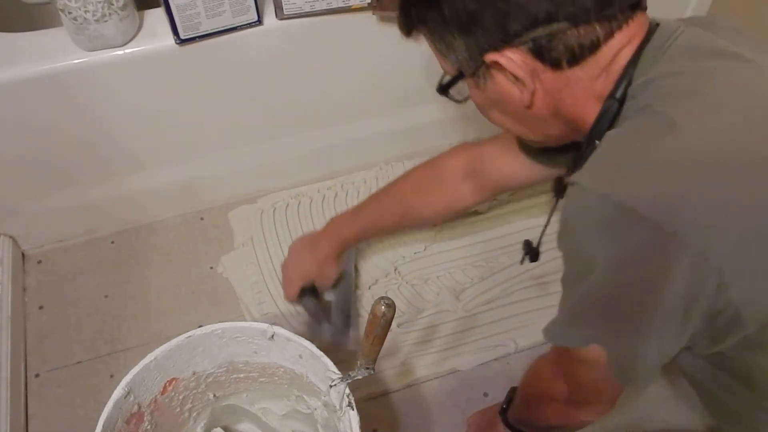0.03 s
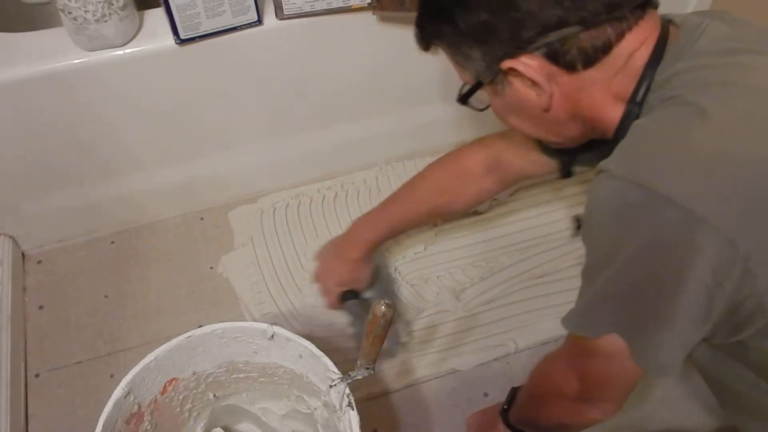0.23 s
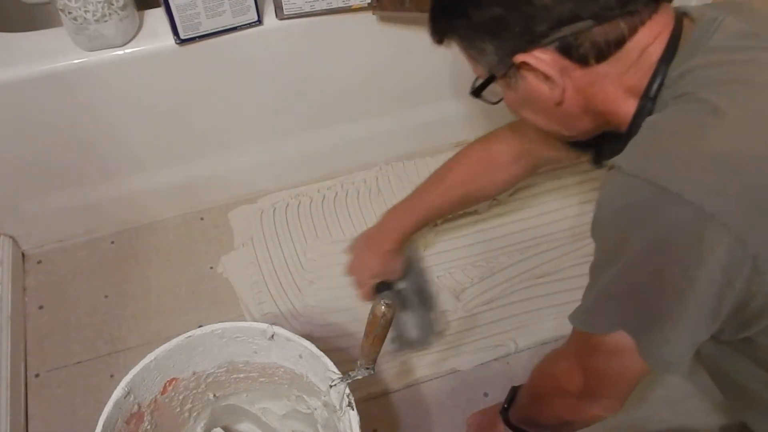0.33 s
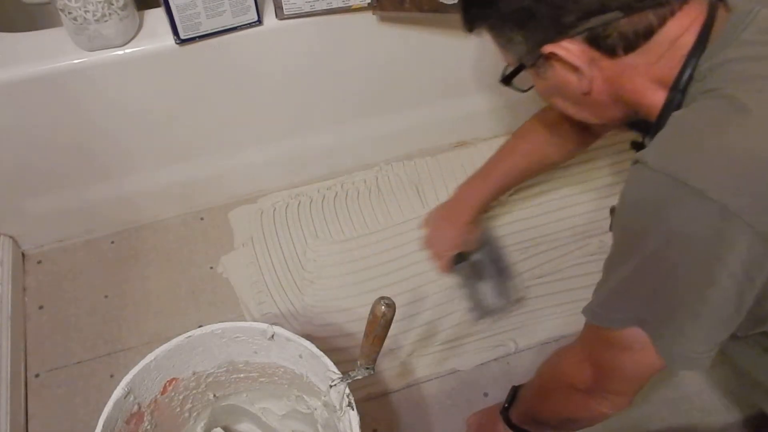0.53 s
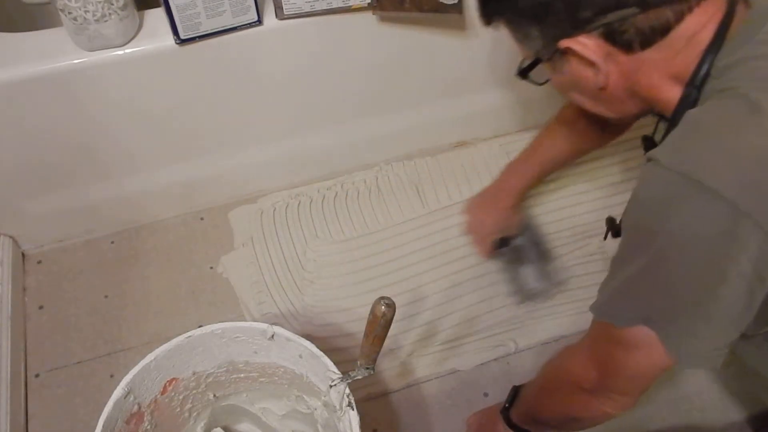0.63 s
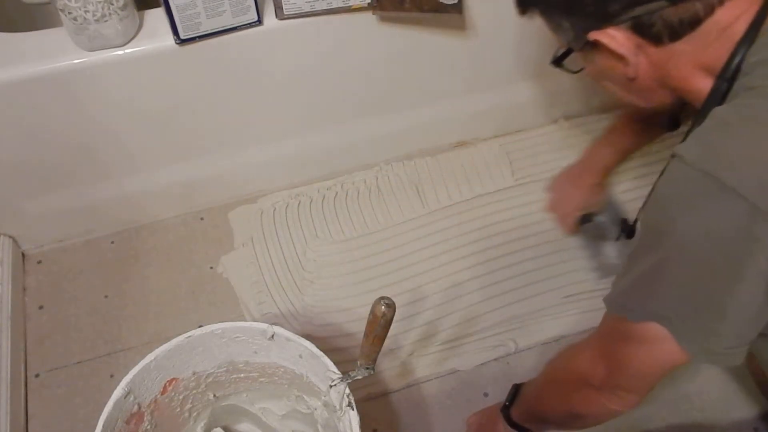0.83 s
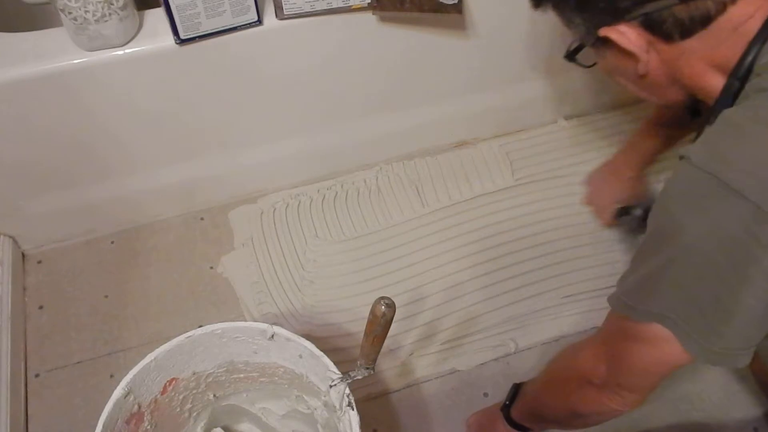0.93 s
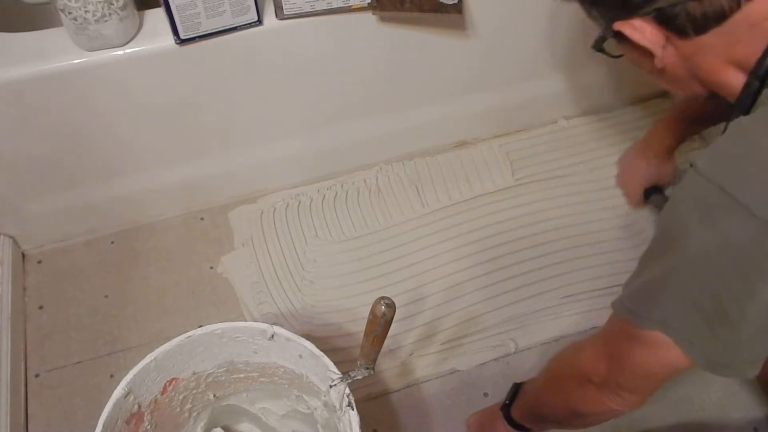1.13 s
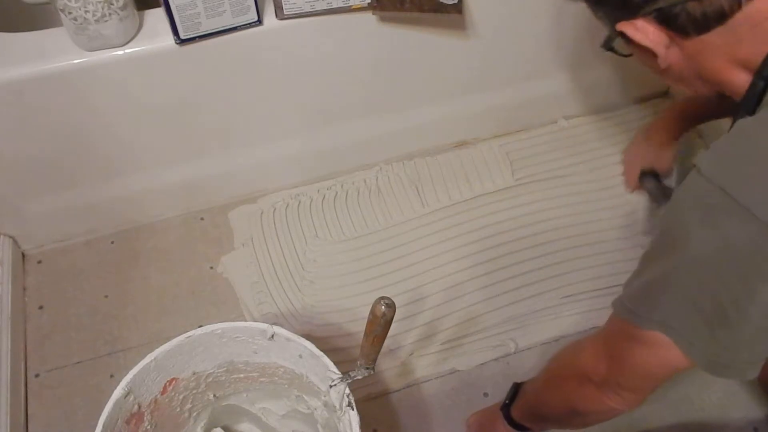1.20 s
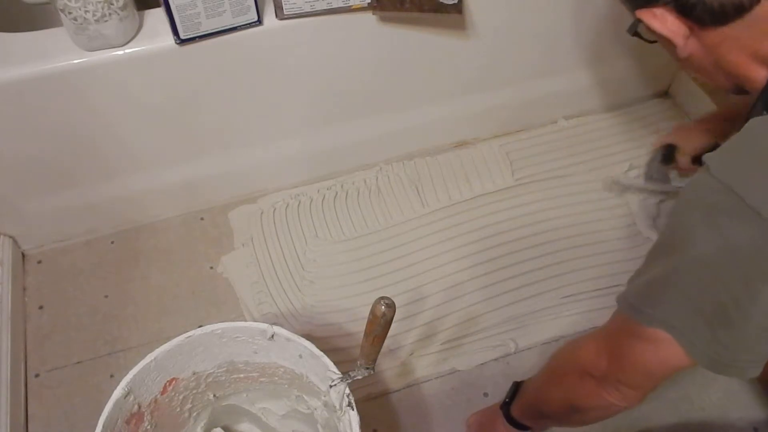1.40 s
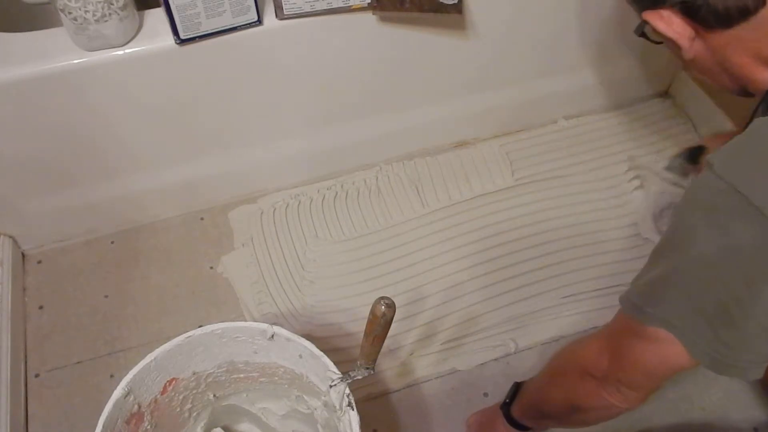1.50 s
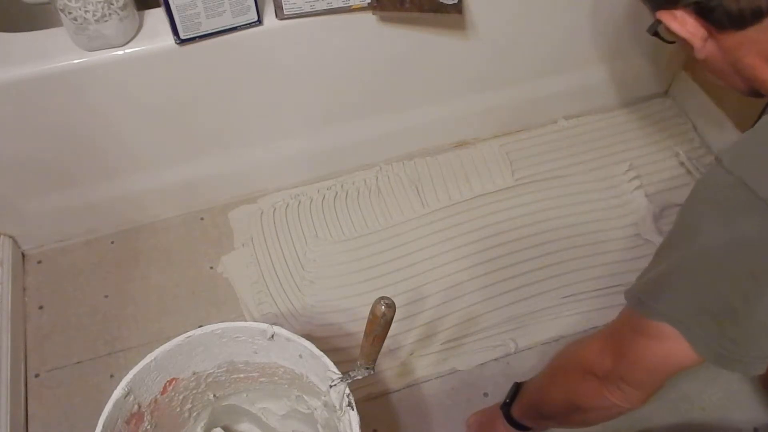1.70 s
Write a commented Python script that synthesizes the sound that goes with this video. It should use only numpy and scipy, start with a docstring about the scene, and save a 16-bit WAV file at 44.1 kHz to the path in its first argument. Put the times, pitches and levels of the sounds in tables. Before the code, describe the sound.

Two raspy trowel scrapes across a mortar-covered floor, with light ticks, in a small bathroom.

```python
"""A fan hums in a small bathroom. A steel trowel is set down with a light tick, then dragged through
wet thinset in a short stroke. Sand grains catch under the blade, the blade rings broadly and the floor
drums under the pressure. The edge knocks down again and a longer, louder stroke follows, snagging on
coarse grit. The hard walls add a short tail, which dies away into the fan."""
import sys
import numpy as np
from scipy import signal
from scipy.fft import rfft, irfft
from scipy.io import wavfile
from scipy.ndimage import uniform_filter1d

SR = 44100
rng = np.random.default_rng(int(sys.argv[2]) if len(sys.argv) > 2 else 0)


def int16_out(signal):
    """Quantize to a 16-bit WAV file."""
    q = np.round(np.clip(np.atleast_2d(signal).T, -1, 1) * 32767)
    wavfile.write(sys.argv[1], SR, q.astype(np.int16))


N = 77175
TIME, FREQS = np.arange(N) / SR, np.fft.rfftfreq(2 * N, 1 / SR)


def amp(db):
    """Decibels to gain."""
    return 10 ** (np.asarray(db) / 20)


def unit(x):
    """Scales to rms 1."""
    return x / np.sqrt(np.mean(x ** 2) + 1e-20)


def read(points, hz=FREQS):
    """Reads a curve on a log-frequency axis."""
    f, value = np.transpose(points)
    return np.interp(np.log(hz + 1), np.log(f + 1), value)


def filtered(x, gain):
    """Applies a frequency response given at FREQS."""
    return irfft(rfft(x, 2 * N) * gain)[..., :N]


def colour(x, spectrum):
    """Minimum-phase EQ from a dB curve, keeping the power of white noise."""
    cepstrum = irfft(np.log(np.maximum(unit(amp(read(spectrum))), 1e-5)))
    cepstrum[1:N] *= 2
    cepstrum[N + 1:] = 0
    return filtered(x, np.exp(rfft(cepstrum)))


def wander(hz):
    """Random drift of rms 1, mostly slower than hz."""
    return unit(filtered(rng.standard_normal(N), 1 / (1 + (FREQS / hz) ** 4)))


def resonate(x, hz, width_hz):
    """A resonance that follows a pitch curve, at rms 1."""
    turn = np.exp(2j * np.pi * np.cumsum(hz) / SR)
    pole = np.exp(-np.pi * width_hz / SR)
    return unit((turn * signal.lfilter([1 - pole], [1, -pole], x / turn)).real)


def mic_pair(common, apart, likeness):
    """Two close microphones: alike in the bass, drifting apart in the treble."""
    # lean of the image (frequency [Hz], left over right [dB])
    lean = [(100, 3.1), (800, 2.4), (2500, 0.75), (15000, 0.66)]
    # phase between the sides (frequency [Hz], lead of the left [rad])
    lead = [(100, 0.28), (2000, -0.19), (6000, -0.34), (10000, -0.79), (12000, -1.1), (15000, -.9)]
    same, sides = np.clip(read(likeness), 0, 1), np.array([[1], [-1]])
    mid = filtered(common, np.sqrt((1 + same) / 2))
    side = filtered(apart, np.sqrt((1 - same) / 2))
    placement = amp(sides * read(lean) / 2) * np.exp(.5j * sides * read(lead))
    return filtered(mid + sides * side, placement)


def fan(air_db=-48, waver_hz=2.2, waver_depth=0.29):
    """The background bed: a fan's wavering hum over soft rushing air."""
    # colour of the moving air (frequency [Hz], relative density [dB])
    air_colour = [(12, -22), (25, 2), (40, -22), (65, -6.5), (90, -1), (140, -6), (180, -13), (350, -13),
                  (480, -13), (650, -17), (1000, -18), (2100, -21), (2900, -27.5), (6000, -35.5),
                  (11000, -37.5), (15500, -48)]
    # tones of the hum (frequency [Hz], level [dB])
    hum_tones = [(51, -57), (101.3, -50.5), (125.5, -52), (414.5, -65), (479, -62)]
    # stereo image of the diffuse fan noise (frequency [Hz], left-right likeness [0-1])
    likeness = [(30, 0.54), (110, 0.99), (400, 0.72), (2000, 0.88), (5000, .66), (10000, 0.4), (15000, .25)]
    air = filtered(rng.standard_normal((2, N)), amp(read(air_colour)))
    air *= amp(air_db) / np.std(filtered(air, FREQS > 200))  # level set by the part above 200 Hz
    hum = np.zeros(N)
    for hz, db in hum_tones:
        waver = 1 + waver_depth * (wander(waver_hz) + 1j * wander(waver_hz))  # in level and phase
        tone = np.exp(2j * np.pi * (hz * TIME + rng.random()))
        hum += amp(db) * np.sqrt(2) * (waver * tone).real
    return mic_pair(air[0] + hum, air[1], likeness)


def bathroom(x, echoes_per_s=4000, first_echo_s=.003):
    """Reverb only: a short, dense tail from close, hard walls."""
    # decay of the room (frequency [Hz], T60 [s])
    room_t60 = [(120, 0.67), (500, 0.46), (2000, 0.39), (5000, 0.41), (9000, 0.28), (16000, .27)]
    count = 30000
    echoes = rng.choice([-1., 1.], count) * (rng.random(count) < echoes_per_s / SR)
    echoes *= np.arange(count) > first_echo_s * SR
    hz, t, bands = signal.stft(echoes, SR, nperseg=256)
    decay = amp(-60 * t / read(room_t60, hz)[:, None])
    tail = signal.istft(bands * decay, SR, nperseg=256)[1]
    return signal.fftconvolve(x, tail / np.linalg.norm(tail))[:N]


def edge_contact(start, length, crunch_db, ring_db, thud_db):
    """A short crush of grit that rings the steel and thumps the floor."""
    # bright crunch of the grit (frequency [Hz], relative density [dB])
    crunch_colour = [(300, -22), (1500, 6), (3500, -2.5), (6000, -4.5), (9000, -1), (12000, -7.5),
                     (14500, 1), (16000, -19)]
    # dull thud of the floor (frequency [Hz], relative density [dB])
    thud_colour = [(60, -28), (130, -3), (200, 1), (400, -11), (900, -8), (3000, -60)]
    # free ring of the blade (frequency [Hz], relative level [dB], T60 [s])
    steel_modes = [(930, 1, 0.092), (1464, -3, 0.093), (1500, -2, .08), (2180, -5, .07), (2888, 4.5, 0.071),
                   (3031, 3, 0.14), (3100, 3, 0.07), (3520, -4, 0.13), (10750, 7, 0.016),
                   (11700, 17, 0.019)]
    age = np.maximum(TIME - start, 0)
    progress = age / length
    crush = rng.standard_normal(N) * np.minimum(progress * 3, 1) * np.exp(-progress ** 2)
    crunch = amp(crunch_db) * colour(crush, crunch_colour)
    thud = amp(thud_db) * colour(crush, thud_colour)
    modes = sum(amp(db - 60 * age / t60) * np.sin(2 * np.pi * hz * age) * rng.choice([-1, 1])
                for hz, db, t60 in steel_modes)
    ring = amp(ring_db) * modes * np.minimum(progress * 2, 1) / np.sqrt(len(steel_modes))
    return crunch + thud + ring


def grit(grains_per_s=9000, spread_db=2.5, judder_hz=69.6, judder_db=1.13):
    """Dense clicks of sand under steel, clumped by the judder of the blade."""
    size = amp(spread_db * np.minimum(rng.exponential(1, N), 4.5))
    clicks = size * rng.choice([-1, 1], N) * (rng.random(N) < grains_per_s / SR)
    return unit(clicks * amp(judder_db * wander(judder_hz)))


def pressed_blade(width_hz=170, upper_ratio=1.82, upper_db=-8):
    """Grit excites two broad resonances of the pressed blade, which shift with its angle."""
    # the lower resonance (time [s], pitch [Hz], level over the rasp curve [dB])
    glide = [(.2, 815, -18), (.29, 840, -1), (.34, 900, 0.5), (.41, 936, -4), (.5, 950, -3), (.6, 825, -9),
             (.72, 830, -4), (.77, 890, -2), (.87, 836, -1.5), (.96, 700, -2.5), (1.1, 715, -5.5)]
    times, pitches, levels = np.transpose(glide)
    pitch = np.interp(TIME, times, pitches)
    lower = amp(np.interp(TIME, times, levels)) * resonate(grit(), pitch, width_hz)
    upper = amp(upper_db) * resonate(grit(), pitch * upper_ratio, width_hz * upper_ratio)
    return lower + upper


def stroke(gesture, spectrum, attack_s=.006, release_s=.015):
    """One drag: the same grains drive floor rumble, rasp and sandy hiss; the blade rings along."""
    rumble_top_hz, rasp_top_hz = 550, 2320
    rumble_trim_db, rasp_trim_db, sand_trim_db = -1, -0.5, 2.5
    times, *levels = np.transpose(gesture)
    rumble_gain, rasp_gain, sand_gain = (amp(np.interp(TIME, times, db)) for db in levels)
    attack = np.clip((TIME - times[0]) / attack_s + 1, 0, 1)
    release = np.exp(-np.maximum(TIME - times[-1], 0) / release_s)
    lows = 1 / (1 + (FREQS / rumble_top_hz) ** 8)
    highs = 1 - 1 / (1 + (FREQS / rasp_top_hz) ** 8)
    scrape = colour(grit(), spectrum)
    rumble = amp(rumble_trim_db) * unit(filtered(scrape, lows))
    rasp = amp(rasp_trim_db) * unit(filtered(scrape, 1 - lows - highs))
    sand = amp(sand_trim_db) * unit(filtered(scrape, highs))
    drag = rumble_gain * rumble + rasp_gain * (rasp + pressed_blade()) + sand_gain * sand
    return attack * release * drag


def scene(room_db=-5.5):
    """Both strokes and the edge contacts in the bathroom, over the fan."""
    # fader moves of each stroke, before the trims (time [s], rumble [dB], rasp [dB], sand [dB])
    short_gesture = [(.175, -40, -29, -33.5), (.225, -31, -30.5, -30.5), (.27, -31, -21.5, -22),
                     (.3, -36, -28, -29), (.33, -26.5, -22.5, -23.5), (.38, -32.5, -24.5, -22.5),
                     (.45, -40, -26, -30), (.495, -41, -31.5, -37), (.545, -44, -48, -49)]
    long_gesture = [(.58, -32.5, -30, -35), (.63, -31, -29, -28.5), (.703, -32, -29, -33),
                    (.722, -35.5, -28, -25), (.762, -25.5, -19.5, -21.5), (.785, -28.5, -26, -27),
                    (.805, -17, -20.5, -22.5), (.835, -35, -23, -18.5), (.85, -24, -18.5, -27.5),
                    (.88, -30.5, -28.5, -23.5), (.925, -24.5, -14.5, -19.5), (.98, -19, -15, -20),
                    (1.055, -26.5, -27, -22), (1.1, -42.5, -30, -38.5), (1.15, -58, -60, -67)]
    # colour of each stroke's scrape (frequency [Hz], relative density [dB])
    short_colour = [(60, -43), (120, -44), (170, -15), (235, -3), (290, -18.5), (380, -2.5), (480, -12),
                    (600, -0.5), (900, -5), (1130, -2.5), (1600, -1.5), (2050, -3.5), (2800, -9),
                    (5000, -15), (8200, -13.5), (11500, -19.5), (15500, -20)]
    long_colour = [(60, -40), (105, -11.5), (140, -2.5), (200, -8.5), (310, -1.5), (420, -1.5), (690, 2),
                   (850, 3), (1200, 0), (1600, -1), (2100, -8), (3000, -13), (5000, -19.5), (8000, -17),
                   (10000, -18.5), (12000, -21.5), (15500, -28)]
    # the edge meets the floor or snags on grit (time [s], length [s], crunch [dB], ring [dB], thud [dB])
    contacts = [(0.055, 0.025, -34.5, -37, -42), (0.165, 0.012, -33.5, -46, -30.5),
                (.271, .012, -19, -44, -50), (0.277, 0.013, -13, -46, -48), (.568, 0.0055, -19.5, -20, -25),
                (.603, 0.0037, -25, -34, -38), (0.618, 0.011, -29, -30, -32),
                (.662, 0.0019, -30, -50, -19.5), (0.703, .003, -26, -48, -44),
                (1.003, 0.0078, -24, -34, -32)]
    # stereo image of the trowel (frequency [Hz], left-right likeness [0-1])
    likeness = [(30, 0.92), (200, 1), (1500, 0.99), (3000, 1), (6000, 0.91), (10000, 0.75), (12000, .42),
                (15000, 0.71)]
    trowel = stroke(short_gesture, short_colour) + stroke(long_gesture, long_colour)
    trowel += sum(edge_contact(*row) for row in contacts)
    in_room = (trowel + amp(room_db) * bathroom(trowel)) / np.sqrt(1 + amp(room_db) ** 2)
    return mic_pair(in_room, bathroom(trowel), likeness) + fan()


def record(dry):
    """Gentle gain control, a narrow notch in the microphone's response, then the band limit."""
    threshold_db, duck_share, peak_fall_db_per_s = -34.5, 0.17, 65
    notch_hz, notch_q, top_hz = 2480, 18.6, 15750
    power_db = 10 * np.log10(abs(uniform_filter1d((dry ** 2).mean(0), size=1200)) + 1e-12)
    fall_db = TIME * peak_fall_db_per_s
    peak_db = np.maximum.accumulate(power_db + fall_db) - fall_db
    ducked = dry / amp(duck_share * np.maximum(peak_db - threshold_db, 0))
    notched = signal.lfilter(*signal.iirnotch(notch_hz, notch_q, SR), ducked)
    high_cut = signal.firwin(511, top_hz, window=("kaiser", 9), fs=SR)
    return signal.oaconvolve(notched, high_cut[None], "same")


dry = scene()
out = record(dry)
int16_out(out)
```